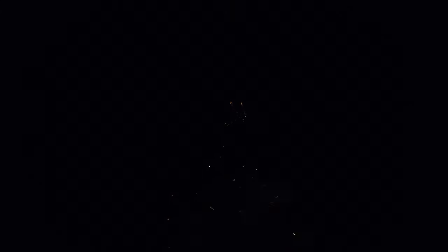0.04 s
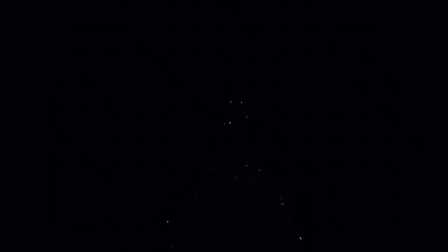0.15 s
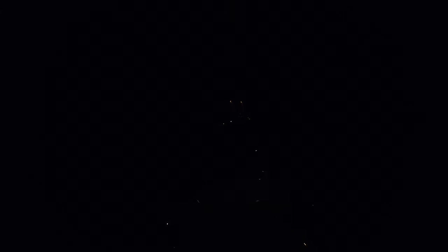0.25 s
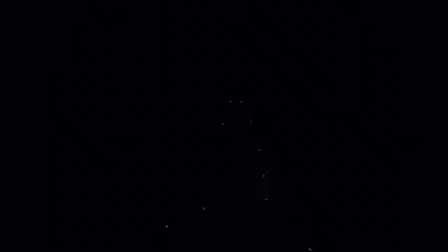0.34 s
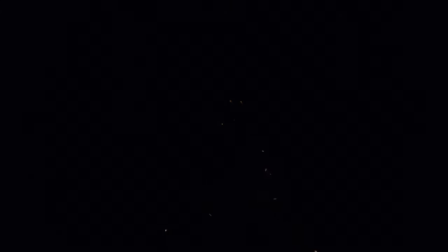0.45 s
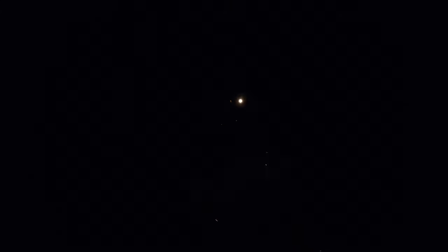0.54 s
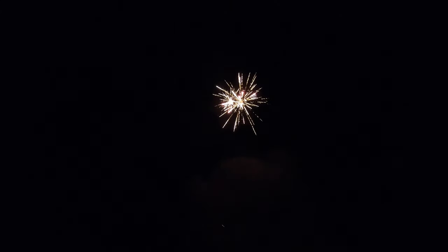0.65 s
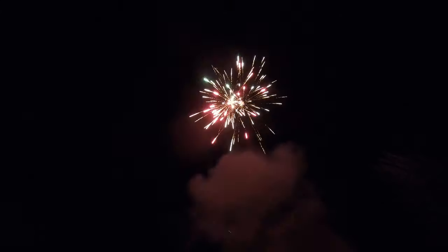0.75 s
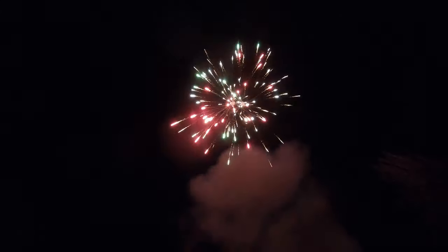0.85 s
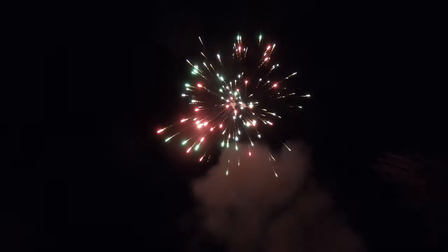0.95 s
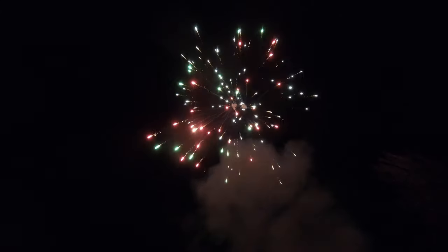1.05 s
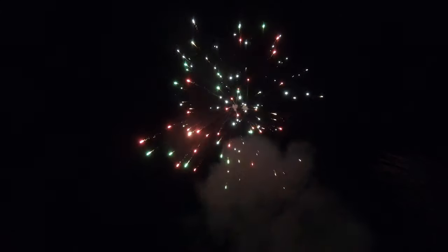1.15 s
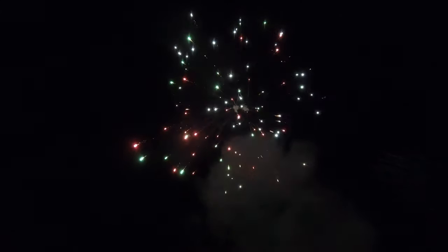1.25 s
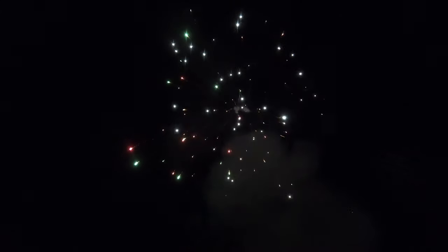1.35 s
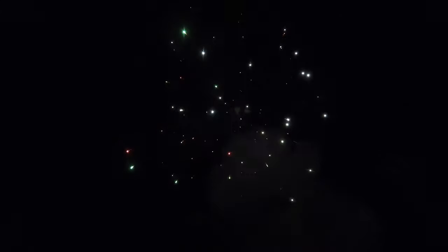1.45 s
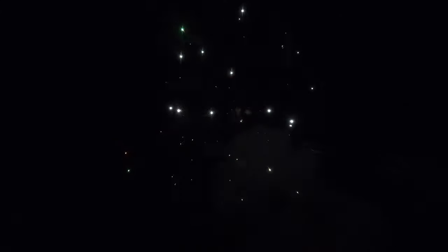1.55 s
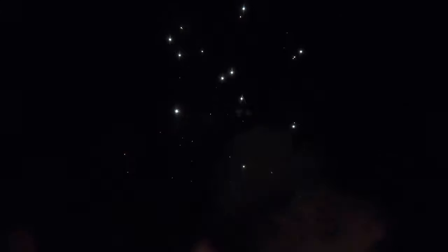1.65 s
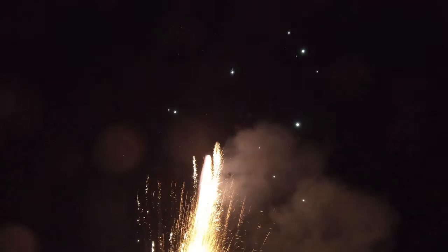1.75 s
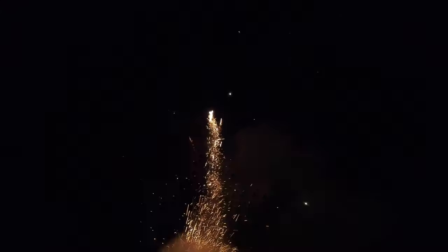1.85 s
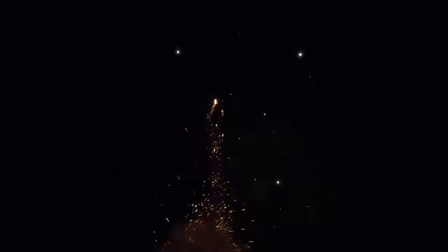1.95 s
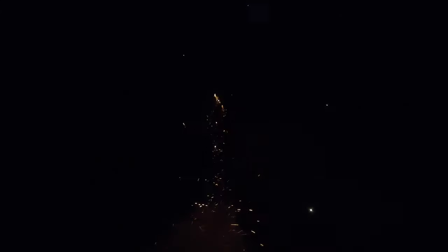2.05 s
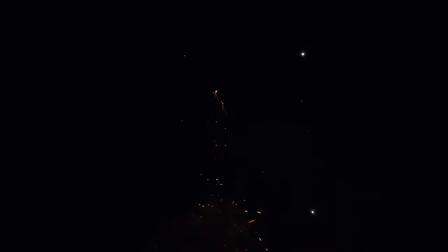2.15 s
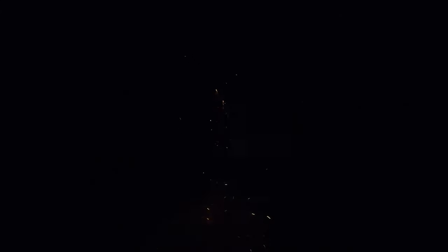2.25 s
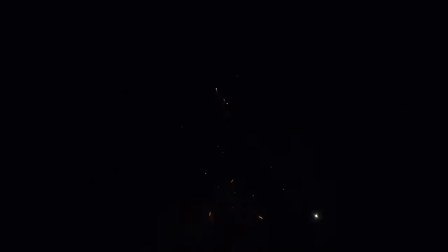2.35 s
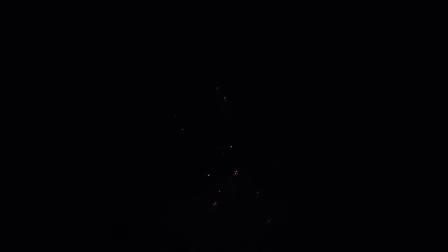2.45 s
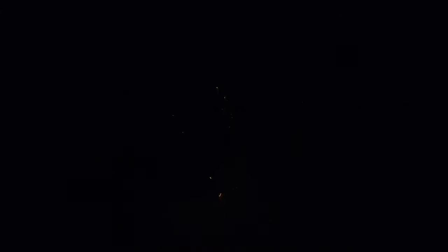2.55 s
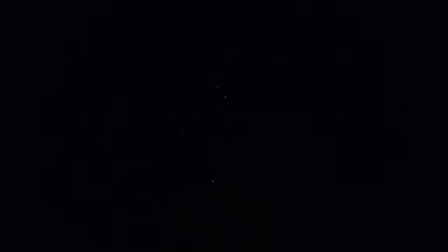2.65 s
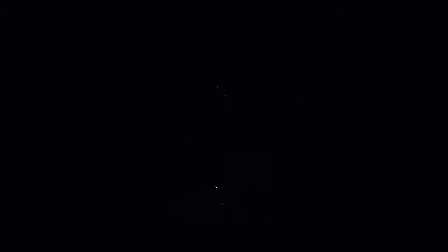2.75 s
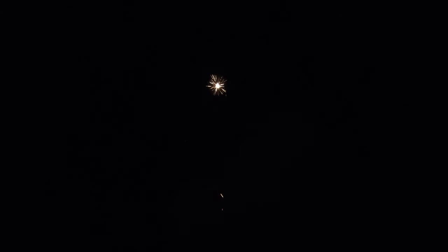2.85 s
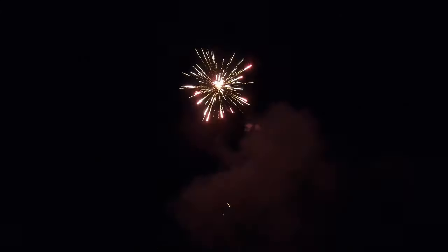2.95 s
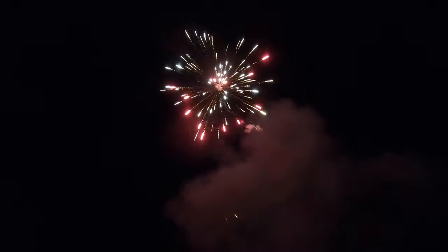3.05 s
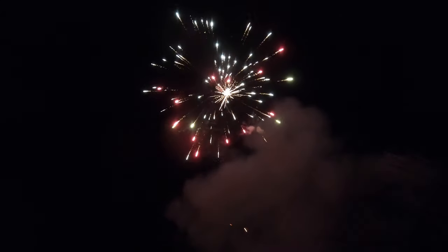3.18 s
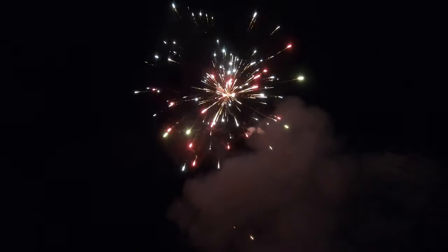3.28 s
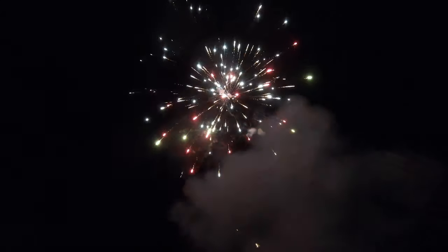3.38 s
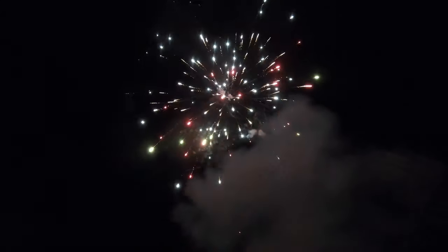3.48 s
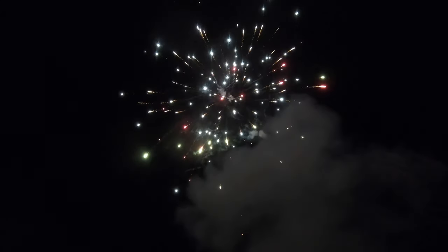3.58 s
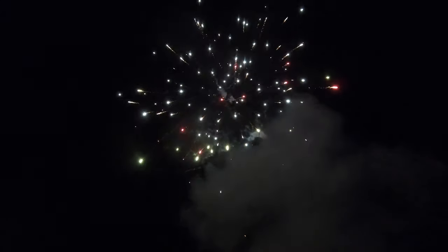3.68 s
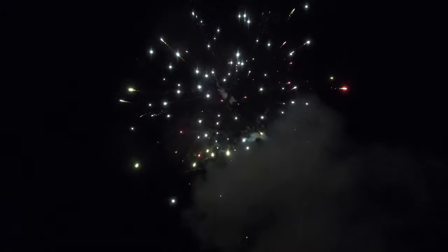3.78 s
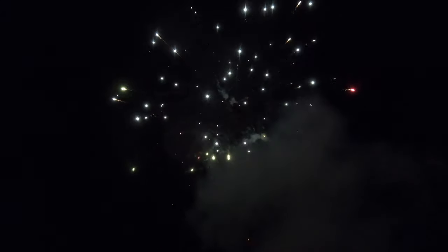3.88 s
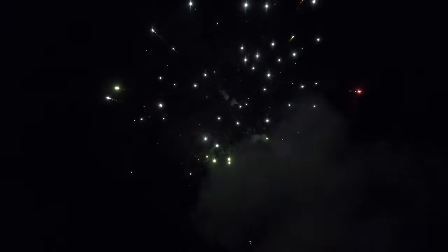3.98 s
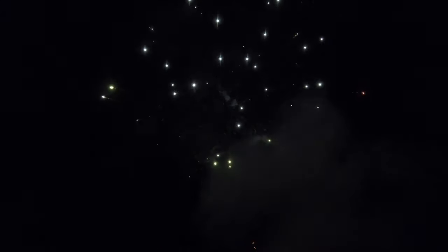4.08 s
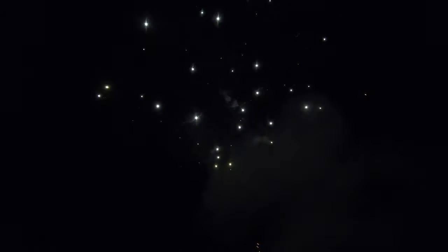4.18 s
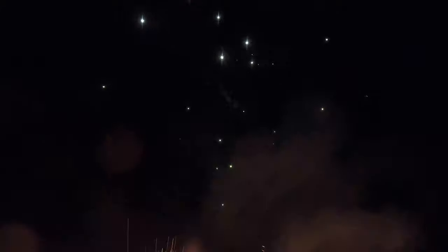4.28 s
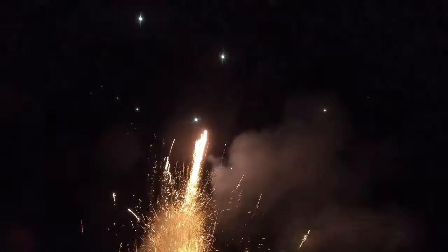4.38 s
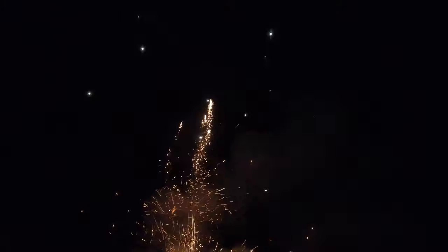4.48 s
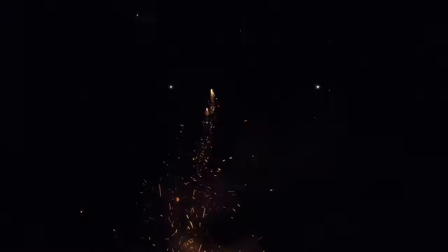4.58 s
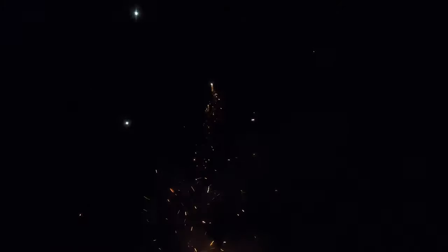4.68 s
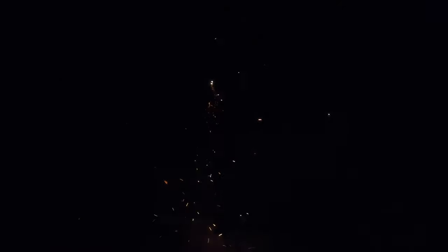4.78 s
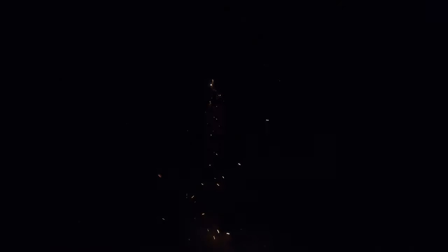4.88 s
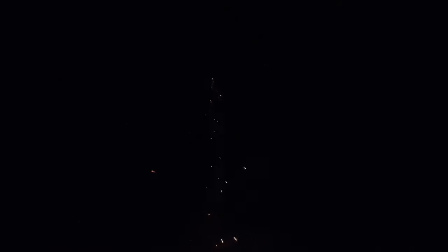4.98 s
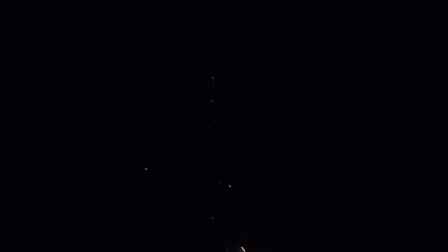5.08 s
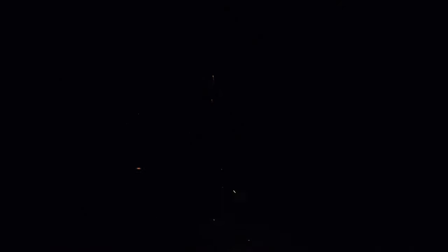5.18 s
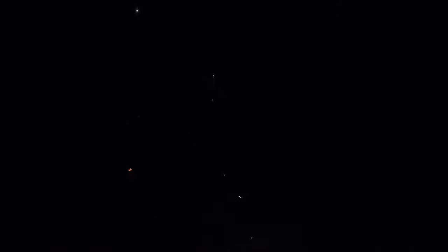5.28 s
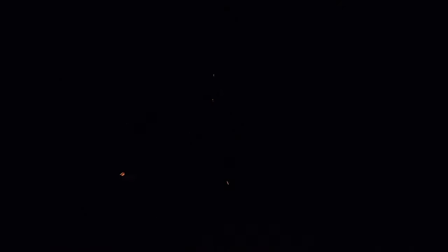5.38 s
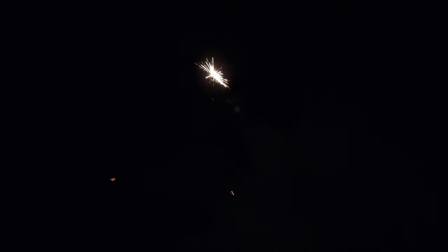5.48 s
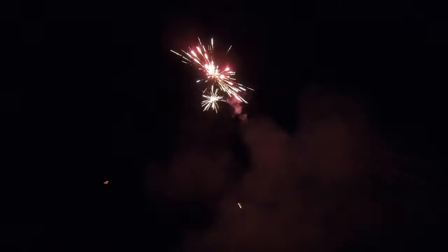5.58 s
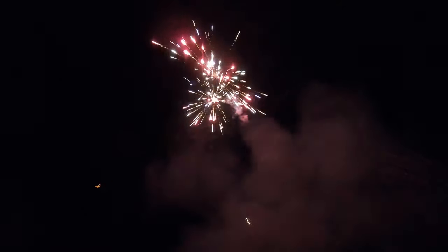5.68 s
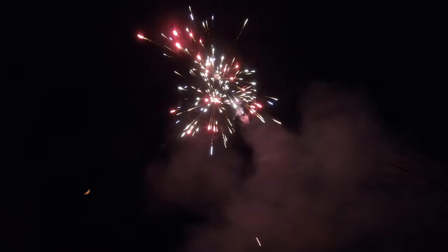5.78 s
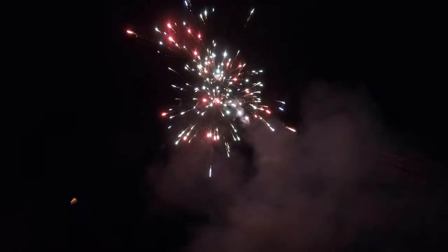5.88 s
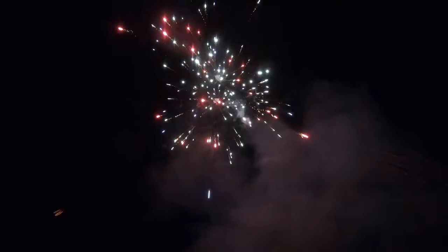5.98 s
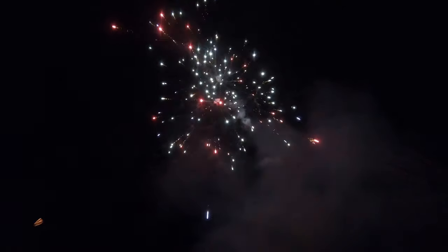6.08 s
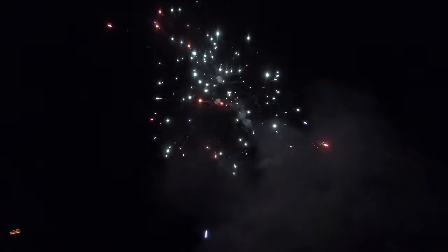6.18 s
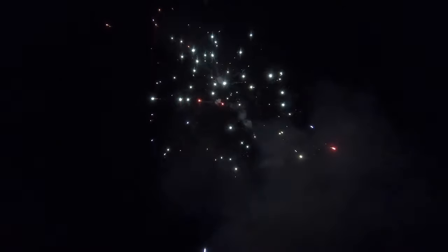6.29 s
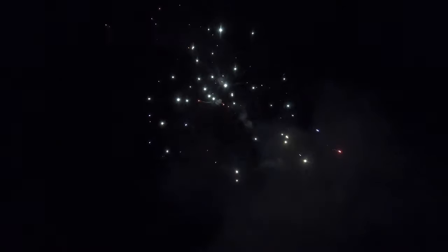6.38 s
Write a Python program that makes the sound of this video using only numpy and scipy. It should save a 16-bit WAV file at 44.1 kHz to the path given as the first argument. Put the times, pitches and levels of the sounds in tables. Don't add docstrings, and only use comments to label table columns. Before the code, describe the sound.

Outdoors at night, close to a firework cake, the sound opens on a faint low rush left by an earlier volley. At 0.7 s a shell cracks hard overhead with a full thump, a softer crack right behind it, then dull echoes and a broad rushing roll. Around 1.65 s two launch charges thud in quick succession, bright and close, and their rush sinks to quiet. Sharp bursts come at about 2.95 and 3.3 s, slapping off walls and slopes; light dry ticks of falling card follow from 3.6 to 4.1 s. At 4.3 s another tight cluster of launch thumps hits, then fades into near silence. Two bright bursts at 5.55 and 5.7 s roll on to the end near 6.4 s, with a late dull echo. The microphone's level drops sharply after each blast and recovers quickly.

```python
import sys
import numpy as np
from scipy import signal
from scipy.fft import rfft, irfft
from scipy.io import wavfile
from scipy.ndimage import uniform_filter1d

SR = 44100
rng = np.random.default_rng(int(sys.argv[2]) if len(sys.argv) > 2 else 0)


def attenuation_scalar(level_db):
    decades = np.asarray(level_db, float) / 20
    return 10 ** decades


def transcribe(u):
    v = np.clip(np.atleast_2d(u).T, -1, 1)
    q = np.round(v * 32767).astype(np.int16)
    wavfile.write(sys.argv[1], SR, q)


N = 283563
STRIDE = 16


def read(table, hz):
    table_hz, values = np.transpose(table)
    return np.interp(np.log(hz), np.log(table_hz), values)


def band(x, lo_hz, hi_hz, order=2):
    edges_hz = [lo_hz, min(hi_hz, .48 * SR)]
    return signal.sosfilt(signal.butter(order, edges_hz, "bandpass", fs=SR, output="sos"), x)


def unit(x):
    return x / np.sqrt(np.mean(x ** 2))


def sides(pan_db):
    return attenuation_scalar([[pan_db / 2], [-pan_db / 2]])


def add(out, sound, start_s, pan_db):
    i = int(round(start_s * SR))
    out[:, i:i + sound.shape[-1]] += (sound * sides(pan_db))[:, :N - i]


# f/Hz, level/dB
MICROPHONE = [(300, -1), (750, -0.5), (1300, -2), (2500, -6.5), (4500, -10.5), (6300, 3), (8000, 10),
              (10000, 3), (13000, -3.5), (17000, -11)]


def coloured(x):
    hz = np.fft.rfftfreq(x.shape[-1], 1 / SR) + 1
    return irfft(rfft(x) * attenuation_scalar(read(MICROPHONE, hz)), x.shape[-1])


def front(t):
    decay = np.where(t < 0, np.exp(t / 3e-4), 1.15 * np.exp(-(t / 4.2e-4) ** 2))
    return -np.tanh(t / 4e-5) * decay


def shock(t, crack_db, thump_db, stretch):
    crack = front(t) + .12 * front(1.5 * (t - 8.5e-4 * stretch))
    u = np.maximum(t, 1e-6) / stretch
    swing = np.sin(np.pi * np.log2(u / 1.28e-3)) * np.exp(-u / 4.8e-3)
    swing = swing * np.clip(u / 6e-4 - 1.9, 0, 1)
    return attenuation_scalar(crack_db) * crack + 0.98 * attenuation_scalar(thump_db) * swing


SWING_ENDS_S = .015


def blast_wave(t, crack_db, thump_db, stretch, treble_db):
    wave = np.array([shock(t - lag_s, crack_db, thump_db, stretch) for lag_s in (0, 7e-5)])
    wave = wave * np.exp(-(np.maximum(t, 0) / SWING_ENDS_S / stretch) ** 4)
    low = signal.sosfiltfilt(signal.butter(2, 4500, fs=SR, output="sos"), wave)
    treble = attenuation_scalar(treble_db) * (wave[0] - low[0]) * np.array([[.7], [1.25]])
    return coloured(low + treble)


def blast_grit(t, noise, crack_db, treble_db):
    edge = coloured(band(noise[:2], 1100, 4500)) * np.exp(-np.abs(t) / 0.00034) * (t > 0)
    bounces = unit(band(noise[:2] + noise[3], 800, 3000, order=3))
    bounces = bounces * np.exp(-((t - .0014) / .0013) ** 2) * (t > 0)
    return edge * attenuation_scalar(crack_db + 2.2 * treble_db - 17) + bounces * attenuation_scalar(crack_db - 29)


BLOCK_S, PORT_HZ = 512 / 48000, 7950
COPIES_DB = [2, -4, -22, -19]


def smear(t, wave, noise, ahead_db):
    edge = wave * np.exp(-(t / 9e-4) ** 2)
    copies = 0
    for k, db in enumerate(COPIES_DB, start=1):
        copies = copies + (-1) ** k * attenuation_scalar(ahead_db + db) * np.roll(edge, -int(k * BLOCK_S * SR), axis=1)
    stair = attenuation_scalar(-8 * np.abs(np.ceil(-t / BLOCK_S) - 1) ** 1.3) * (t < 0)
    scramble = 1.1 * unit(band(noise[2], 105, 165))
    scramble = scramble + .46 * unit(band(noise[2:], 500, 1200)) + .012 * unit(band(noise[2:], 1500, 4000))
    ring = attenuation_scalar(-22) * np.sin(2 * np.pi * PORT_HZ * t) * np.array([[.4], [1]])
    heave = attenuation_scalar(2 * ahead_db + 12.5) * np.cos(np.pi * t / BLOCK_S) * np.exp(-(t / .026) ** 4) * (t < 0)
    return copies + attenuation_scalar(ahead_db) * uniform_filter1d(stair, size=60) * (scramble + ring) + heave


# t/s, crack level/dB, thump level/dB, length factor, treble level/dB
BURSTS = [
    (0.7022, 4, 2, 0.95, -7.5),
    (0.7588, -2.5, -0.5, 1.1, -8),
    (2.9647, 4, -2.5, 0.98, -6.5),
    (3.2854, 2.5, 1, 0.97, -2.5),
    (5.5630, 3, 0, 0.99, -5.5),
    (5.7047, 1, -1.5, 0.99, -1),
]
# t/s, crack level/dB, thump level/dB, length factor, treble level/dB
LIFTS = [
    (1.6544, 0.5, -3, 1., 1.5),
    (1.6931, -9, -3, 1.3, 6),
    (4.281, -6.5, -14, 0.42, 2),
    (4.2843, 0.5, -2, 1., 4.5),
    (4.3049, -7.5, -3, 0.96, -0.5),
]
# level/dB at a 0 dB crack, dB more per dB of crack
BURST_SMEAR, LIFT_SMEAR = (-33, 0.91), (-13.5, 2.8)


def blasts():
    out, t = np.zeros((2, N)), np.arange(-.05 * SR, 0.037 * SR) / SR
    smears = [BURST_SMEAR] * len(BURSTS) + [LIFT_SMEAR] * len(LIFTS)
    for (s, crack_db, thump_db, stretch, treble_db), (smear_db, growth) in zip(BURSTS + LIFTS, smears):
        noise = rng.standard_normal((4, len(t)))
        wave = blast_wave(t, crack_db, thump_db, stretch, treble_db)
        grit = blast_grit(t, noise, crack_db, treble_db)
        ahead = smear(t, wave, noise, smear_db + growth * crack_db)
        add(out, wave + grit + ahead, s - .05, pan_db=-2.5)
    return out


# t/s, level/dB, cut-off f/Hz, left minus right level/dB
ECHOES = [(0.831, -29, 500, -6), (.876, -20, 500, -2.5), (1.319, -36, 1500, -16), (3.027, -22.5, 2000, 0.5),
          (3.19, -19.5, 2560, 0.5), (3.501, -22.5, 3040, -1), (4.057, -31, 1500, 3), (4.207, -41, 1480, -5),
          (4.571, -35, 318, -2), (5.748, -45, 1500, 7), (5.924, -39, 3000, -4), (6.376, -24, 1190, -2)]
# delay t/s, level/dB re thump, cut-off f/Hz, left minus right level/dB
LIFT_WALLS = [
    (0.1227, -32, 2500, 4),
    (0.1738, -22, 297, -2.5),
]


def echoes():
    out, t = np.zeros((2, N)), np.arange(-.002 * SR, 0.072 * SR) / SR
    unducked = shock(t, 2, 0, 1.1) * np.clip(t / .004, .35, 2.2)
    walls = [(s + delay_s, thump_db + db, hz, pan_db)
             for s, _, thump_db, *_ in LIFTS for delay_s, db, hz, pan_db in LIFT_WALLS]
    for s, level_db, cut_hz, pan_db in ECHOES + walls:
        low_pass = signal.butter(3, cut_hz, fs=SR, output="sos")
        dull = signal.sosfilt(low_pass, band(unducked, 70, 16000))
        add(out, dull * attenuation_scalar(level_db) / np.abs(dull).max(), s - .002, pan_db)
    return out


# t/s, peak level/dB, left minus right level/dB
DEBRIS = [
    (3.6207, -33, 3.5),
    (3.6422, -21, -1),
    (3.7793, -33.5, 12),
    (3.873, -36.5, -5),
    (3.95, -42, -13),
    (4.0332, -73, 12),
    (4.1073, -60, 6),
    (4.143, -59.5, 1),
    (5.304, -60, -6.5),
    (6.4274, -47, -3),
]


def debris():
    out, t = np.zeros((2, N)), np.arange(.006 * SR) / SR
    for s, peak_db, pan_db in DEBRIS:
        snap = (1 + .3 * rng.standard_normal((2, len(t)))) * np.exp(-t / 1.6e-4)
        tick = band(snap, 7000, 9400, order=3) + .22 * band(snap, 9500, 14000, order=3)
        add(out, tick * attenuation_scalar(peak_db + 3.5) / np.abs(tick).max(axis=1, keepdims=True), s, pan_db)
    return out


def clock():
    return np.arange(0, N, STRIDE) / SR


# depth level/dB, recovery t/s
BURST_DUCK, LIFT_DUCK, DUCK_ATTACK_S = (-25, 0.079), (-33.5, 0.13), 0.0031
DUCK_BEND = 2.6
EARLIER_LIFT_S = -0.36


def gain_and_age():
    t = clock()
    starts = np.array([EARLIER_LIFT_S] + [row[0] for row in LIFTS + BURSTS])
    since = t - starts[:, None]
    latest = np.argmin(np.where(since >= 0, since, np.inf), axis=0)
    ducks = [LIFT_DUCK] * (len(LIFTS) + 1) + [BURST_DUCK] * len(BURSTS)
    depth_db, recover_s = np.transpose(ducks)[:, :, None]
    dips_db = depth_db * np.clip(1 - since / recover_s, 0, 1) ** DUCK_BEND * (since >= 0)
    return np.min(dips_db, axis=0), t - starts[latest], latest <= len(LIFTS)


def lagging(db):
    size = int(DUCK_ATTACK_S * SR)
    held = np.repeat(db, STRIDE, axis=-1)[..., :N]
    return uniform_filter1d(held, size, origin=(size - 1) // 2, mode="nearest")


def swells(sources, table):
    t, out = clock(), 0
    for delay_s, spread_s, db, down_db, up_db in table:
        shape = sum(attenuation_scalar(row[2]) ** 2 * np.exp(-((t - row[0] - delay_s) / spread_s) ** 2) for row in sources)
        out = out + np.outer(attenuation_scalar([db + down_db, db, db + up_db, db + 2 * up_db]) ** 2, shape)
    return out


# starting level/dB, change with age in dB per s
BURST_RUSH_DB, BURST_RUSH_DB_PER_S = (-34.5, -36, -46, -49.5), (5.5, 4.5, -4.5, -37)
LIFT_RUSH_DB, LIFT_RUSH_DB_PER_S = (-34, -50.5, -51.5, -53), (-48.5, -42, -38.5, -55)
FAR_RUSH_DB, FAR_RUSH_DB_PER_S = (-57, -62, -62, -74), (2.5, 5, -14, -22)
VOLLEY_FAR_DB = (-4.5, 1.5, -1)
NEAR_ENDS_S, NEAR_FADE_S = .38, 0.039
BURST_HOLD_S = .16
# delay t/s, spread t/s, roar level/dB re thump, rumble over roar level/dB, dB per band upward
BURST_SWELLS = [
    (0.07, .014, -31.5, -2, -11.5),
    (.222, 0.0043, -38, -4.5, -5.5),
    (0.439, 0.064, -29, -18, -21),
    (.65, .07, -36, -0.5, -26),
]
LIFT_SWELLS = [
    (0.12, 0.005, -49.5, 15, -0.5),
    (0.276, 0.041, -62, 21, -3.5),
]


def rush_line(age, start_db, db_per_s):
    return attenuation_scalar(np.array(start_db)[:, None] + np.outer(db_per_s, age)) ** 2


def returns(age, lift):
    burst = rush_line(np.maximum(age - BURST_HOLD_S, 0), BURST_RUSH_DB, BURST_RUSH_DB_PER_S)
    burst = burst + swells(BURSTS, BURST_SWELLS)
    age = np.maximum(age, 0)
    near_fade = np.clip((NEAR_ENDS_S - age) / NEAR_FADE_S + 1, 0, 1)
    near = rush_line(age, LIFT_RUSH_DB, LIFT_RUSH_DB_PER_S) * near_fade ** 2
    volley = np.searchsorted([LIFTS[0][0], LIFTS[2][0]], clock())
    far = rush_line(age, FAR_RUSH_DB, FAR_RUSH_DB_PER_S) * attenuation_scalar(VOLLEY_FAR_DB)[volley] ** 2
    return 10 * np.log10(np.where(lift, near + far + swells(LIFTS, LIFT_SWELLS), burst))


def walk(rate):
    k = int(SR / rate)
    held = np.repeat(rng.standard_normal(N // k + 1), k)
    return unit(uniform_filter1d(uniform_filter1d(held, k), k)[:N])


RUSH_BANDS_HZ = [110, 500, 2000, 7000]
# f/Hz, level/dB per Hz
RUSH_COLOUR = [(15, -54), (25, -41), (82, 0), (134, 4), (330, 0.5), (520, -4), (988, -18), (1370, -16),
               (2220, -22), (2480, -18), (3160, -23), (4870, -31.5), (7510, -29), (16000, -97.5)]
# f/Hz, level/dB per Hz
NIGHT = [(15, -47), (25, -10.5), (197, 6.5), (418, -11.5), (569, -21), (1410, -14), (2750, -28.5),
         (4860, -46), (7350, -46.5), (12000, -70), (15600, -102), (22000, -120)]
NIGHT_DB = -55.5
# f/Hz, left-right correlation
LIKENESS = [(60, 1), (130, 0.97), (290, 1), (640, 0.5), (1410, 0.82), (3100, 0.46), (6820, -0.13),
            (15000, -0.13)]
# f/Hz, left minus right level/dB
LEAN = [(60, -0.5), (110, -3), (200, -1.5), (380, -5.5), (700, -5), (1290, -4), (2380, -3.5), (4400, -1.5),
        (8120, -1.5), (15000, 2)]
TOP_DB, TOP_LOSS_DB_PER_S = 34, 127


def rush():
    gain_db, age, lift = gain_and_age()
    bands_db = lagging(returns(age, lift) + gain_db)
    gain_db, age = lagging(gain_db), lagging(age)
    early_db = bands_db[:, int(.85 * SR):int(1.1 * SR)].mean(axis=1)
    change_db = bands_db - early_db[:, None]
    centres = 28 * 2 ** (np.arange(28) / 3)
    width_db = 10 * np.log10(centres)
    colour_db, night_db = read(RUSH_COLOUR, centres) + width_db, read(NIGHT, centres) + width_db
    roar = (centres > 250) & (centres < 1000)
    colour_db += early_db[1] - 10 * np.log10(np.sum(attenuation_scalar(2 * colour_db[roar])))
    night_db += NIGHT_DB - 10 * np.log10(np.sum(attenuation_scalar(2 * night_db)))
    clumps, out = walk(45), 0
    for hz, own_db, air_db in zip(centres, colour_db, night_db):
        place = np.interp(np.log(hz), np.log(RUSH_BANDS_HZ), np.arange(4))
        low = min(int(place), 2)
        now_db = change_db[low] + (place - low) * (change_db[low + 1] - change_db[low])
        now_db = now_db + max(np.log2(hz / 7600), 0) * (TOP_DB - TOP_LOSS_DB_PER_S * age)
        returned = attenuation_scalar(own_db + now_db + clumps + 0.69 * walk(18))
        level = np.hypot(returned, attenuation_scalar(air_db + gain_db))
        lo_hz, hi_hz, order = hz * 2 ** (-1 / 6), hz * 2 ** (1 / 6), 2 + (hz > 6000)
        mid, side = (unit(band(rng.standard_normal(N), lo_hz, hi_hz, order)) for _ in range(2))
        alike = np.clip(read(LIKENESS, hz), -.5, .99)
        pair = mid + np.sqrt((1 - alike) / (1 + alike)) * side * np.array([[1], [-1]])
        out = out + level * pair * sides(read(LEAN, hz))
    return out


def scene():
    return blasts() + echoes() + debris() + band(rush(), 38, 18000, order=1)


def band_limit(x):
    return signal.sosfilt(signal.butter(12, 17200, fs=SR, output="sos"), x)


def record(dry):
    roll_off = signal.butter(2, 14000, fs=SR, output="sos")
    smooth = signal.sosfiltfilt(roll_off, np.clip(dry, -1.05, 1.05))
    return band_limit(np.clip(smooth, -1, 1))


dry = scene()
out = record(dry)
transcribe(out)
```